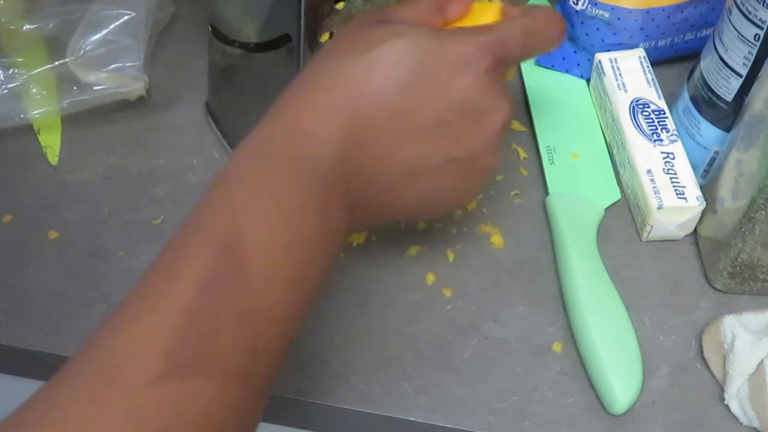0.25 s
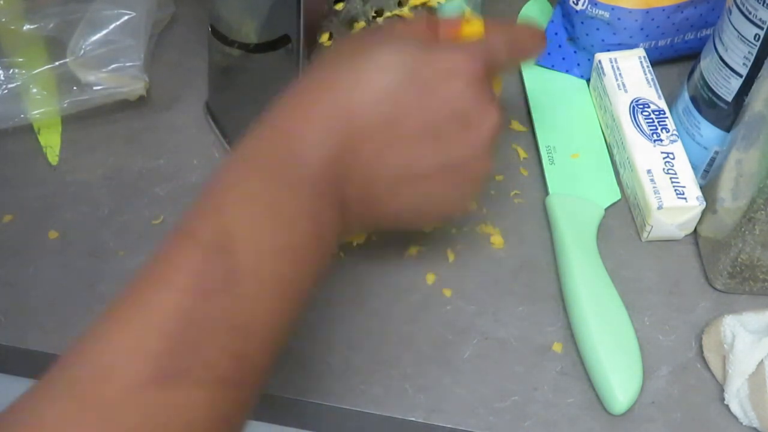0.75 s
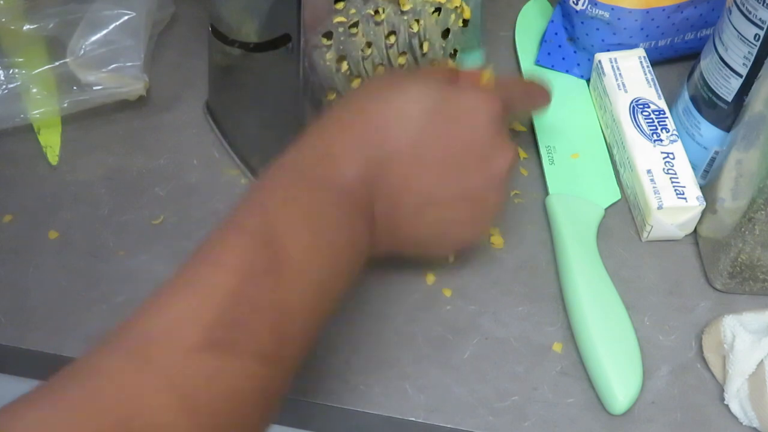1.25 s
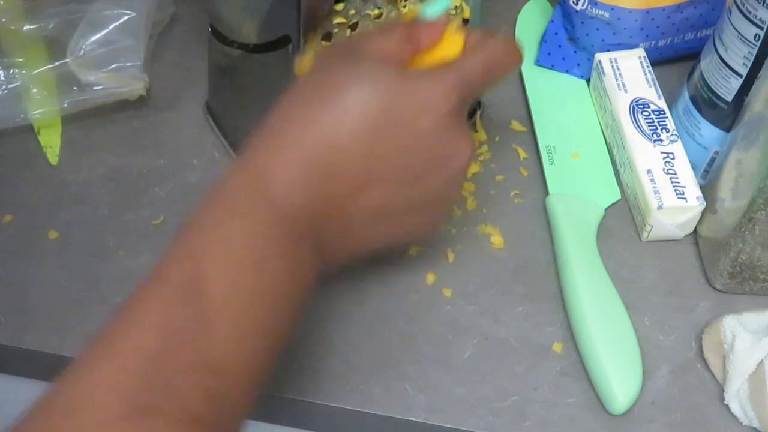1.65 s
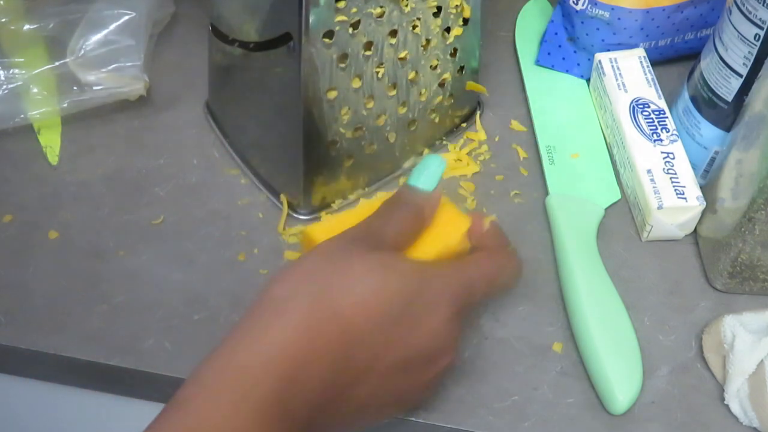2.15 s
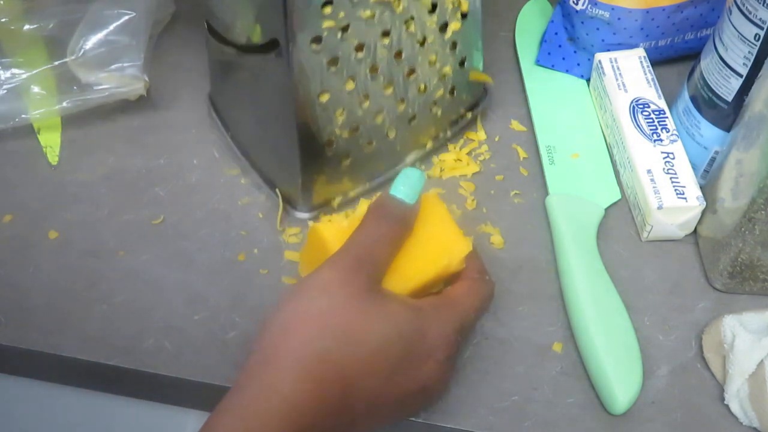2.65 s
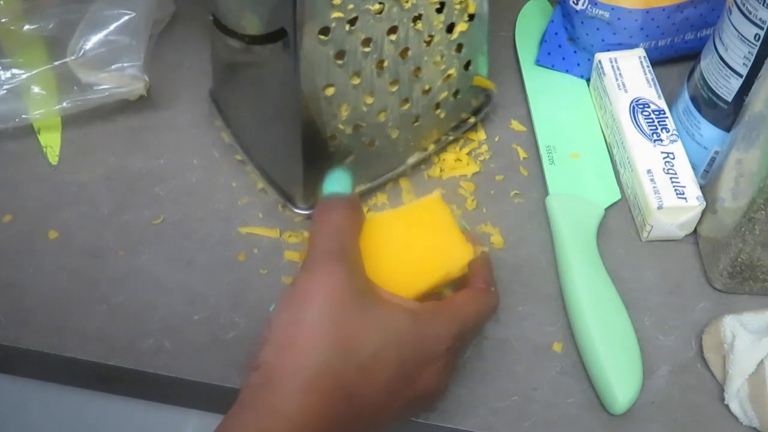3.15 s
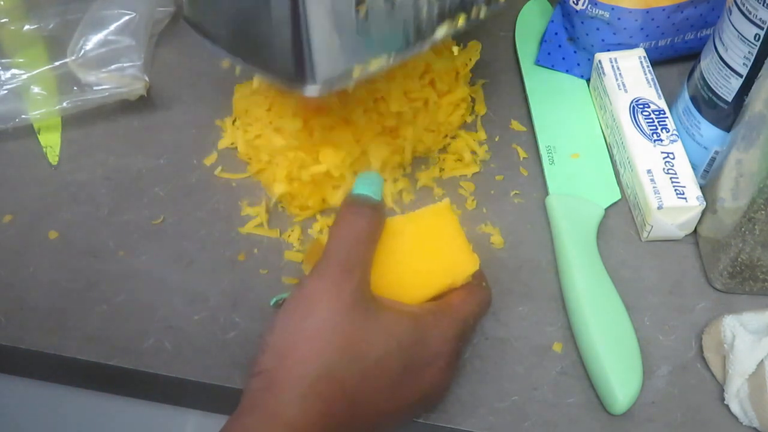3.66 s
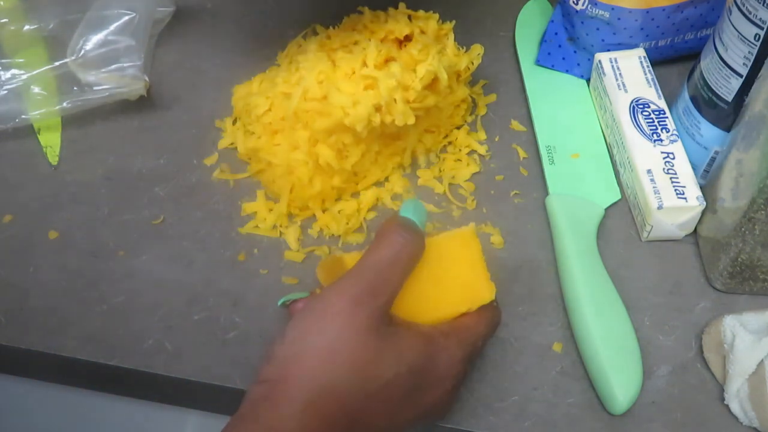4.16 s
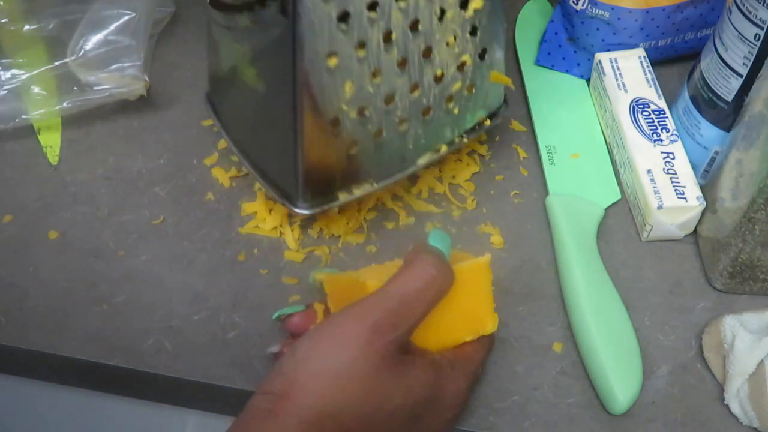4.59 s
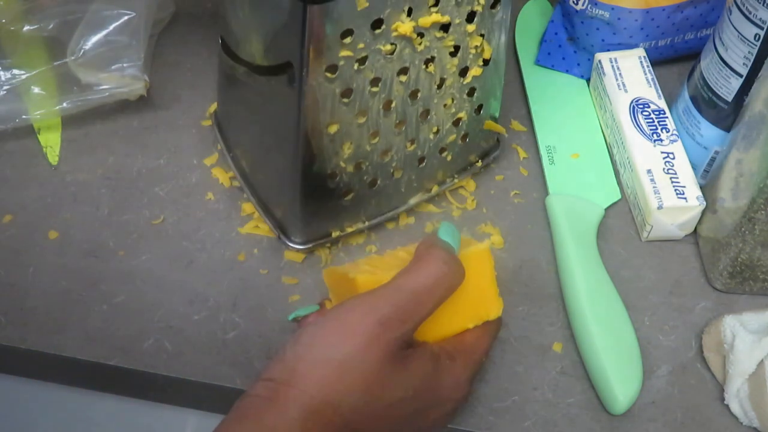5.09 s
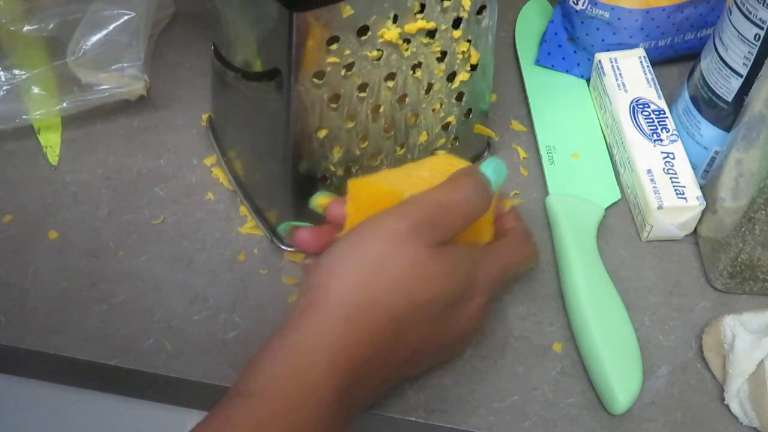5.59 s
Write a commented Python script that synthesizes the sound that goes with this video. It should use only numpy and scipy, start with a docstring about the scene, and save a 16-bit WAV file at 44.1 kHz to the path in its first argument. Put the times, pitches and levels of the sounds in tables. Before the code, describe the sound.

Close stereo capture in a small kitchen with short echo. A low appliance hum runs throughout. Soft hollow counter knocks and faint rubbing come first, then a metallic clink. Harder thuds, rattles and bright scrapes follow, ending in an overloaded bang just after three seconds. Hum is left, with faint ticks, then brief metal rasps near the end.

```python
"""Kitchen counter: cheese is grated on a steel box grater, close to a small stereo recorder.
The grater rocks and knocks on the hollow counter (ringing modes, crack, rattle, thump), ticks (struck steel modes)
and scrapes (dense random slips ringing the steel). An appliance hums: shaped noise and a motor tone.
Kitchen echo is decaying noise. The loudest knocks overload the recorder, whose gain control ducks and creeps back."""
import sys
import numpy as np
from scipy import signal
from scipy.fft import rfft, irfft, next_fast_len
from scipy.io import wavfile
from scipy.ndimage import uniform_filter1d, minimum_filter1d

SR = 44100
rng = np.random.default_rng(int(sys.argv[2]) if len(sys.argv) > 2 else 0)


def pcm_store(signal):
    """Save signal as 16-bit PCM."""
    levels = np.round(np.clip(np.atleast_2d(signal), -1, 1) * 32767)
    wavfile.write(sys.argv[1], SR, levels.astype(np.int16).T)


N = 257103


def amp(db):
    """Amplitude factor from dB."""
    return 10 ** (np.asarray(db) / 20)


def rms_one(x):
    """Scales to rms 1."""
    return x / np.sqrt(np.mean(x ** 2) + 1e-20)


def at_hz(points, hz):
    """Reads column 2 of a table on a log-frequency axis."""
    table_hz, value = np.transpose(points)
    return np.interp(np.log(hz), np.log(table_hz), value)


def band(x, low_hz, high_hz):
    """Butterworth band-pass."""
    return signal.sosfilt(signal.butter(2, [low_hz, high_hz], "band", fs=SR, output="sos"), x)


def narrow(x, low_hz, high_hz):
    """Band-pass with steep edges."""
    return band(band(x, low_hz, high_hz), low_hz, high_hz)


def bell(hz, centre_hz, octaves, order=2):
    """Weight in dB falling away from a centre pitch; a higher order has a flatter top."""
    distance = np.log2(hz / centre_hz) / octaves
    return np.maximum(-6 * distance ** order, -40)


def drift(rate_hz):
    """Slow random wander of rms 1, low-passed near rate_hz."""
    step = 40   # samples per control point
    pole = np.exp(-2 * np.pi * rate_hz * step / SR)
    noise = rng.standard_normal(N // step + 2002)
    slow = signal.lfilter([1], [1, -2 * pole, pole ** 2], noise)[2000:]
    return np.interp(np.arange(N) / step, np.arange(len(slow)), rms_one(slow))


def clicks(times_s, gains):
    """Impulse train."""
    out = np.zeros(N)
    out[np.round(np.asarray(times_s) * SR).astype(int)] = gains
    return out


def ring(drive, hz, t60_s):
    """Two-pole resonator: a unit click sets a sine of height 1 ringing."""
    r = amp(-60 / (t60_s * SR))
    w = 2 * np.pi * hz / SR
    return signal.lfilter([0, np.sin(w)], [1, -2 * r * np.cos(w), r * r], drive + 1e-18)


def fading(times_s, db, t60_s):
    """Envelope that jumps at each blow and dies exponentially."""
    return signal.lfilter([1], [1, -amp(-60 / (t60_s * SR))], clicks(times_s, amp(db)) + 1e-18)


def grit(per_s, spread_db):
    """Random clicks of either sign and uneven size, rms 1."""
    marks = (rng.random(N) < per_s / SR) * rng.choice([-1, 1], N)
    size_db = spread_db * np.minimum(rng.exponential(1, N), 4)
    return rms_one(marks * amp(size_db))


def two_sides(mid, side):
    """Left and right from a shared and an unshared part."""
    return mid + side * [[1], [-1]]


DETUNE = .008   # rms share by which pressure and place shift the modes from blow to blow


def strike(modes, blows, grip_t60_s, scatter_db, in_step_hz):
    """Place of a blow picks the modes, grip damps them; low modes start together, higher neighbours opposite."""
    hz, mode_db, t60_s = np.transpose(modes)[:, :, None]
    luck = rng.standard_normal((len(blows), 2, len(modes), 1))
    sign = np.where(hz < in_step_hz, 1, (-1) ** np.arange(len(modes))[:, None])
    t = np.arange(SR // 3) / SR
    out = np.zeros(N + SR)
    for (start_s, db, centre_hz, octaves, *_), grip_s, (chance, shift) in zip(blows, grip_t60_s, luck):
        start_db = db + mode_db + bell(hz, centre_hz, octaves) + scatter_db * chance
        level_db = start_db - 60 * t * (1 / t60_s + 1 / grip_s)
        tones = sign * amp(level_db) * np.sin(2 * np.pi * hz * (1 + DETUNE * shift) * t)
        out[round(start_s * SR):][:len(t)] += np.sum(tones, axis=0)
    return out[:N]


# broad appliance spectrum, shape only: pitch_hz, density_db
HUM = [(15, -12), (25, -15), (59, 0), (122, -8.5), (267, -6.5), (306, -17.5), (411, -7), (539, -14),
       (616, -14), (1210, -22.5), (1710, -22.5), (2240, -26.5), (5920, -35.5), (14000, -51.5), (15600, -62)]
# narrow hum bands, before patchiness: pitch_hz, width_hz, rms_db
HUM_BANDS = [(74.5, 9.1, -40.5), (97.6, 25, -45.5), (170.4, 12.4, -43), (224.4, 11, -41), (268.3, 14, -39),
             (342.7, 34, -45.5), (363, 1.6, -55.5), (382.6, 13, -42), (412.5, 12, -48), (489, 14, -54),
             (607.6, 40, -48.5), (656, 9.7, -57), (785, 17, -55)]
# unshared part of hum and echo: pitch_hz, side_minus_mid_db
APART = [(60, -49), (150, -26.5), (380, -21.5), (950, -12.5), (2380, -12.5), (5980, -5.5), (15000, 5)]
HUM_RMS_DB, HUM_PATCHY_DB = -35, 0.59   # broad part before patchiness; rms wander of level


def hum():
    """Appliance: broad noise plus narrow noise bands, slightly patchy, only partly shared by the two sides."""
    size = next_fast_len(N)
    hz = np.maximum(np.arange(size // 2 + 1) * SR / size, 1)
    broad = amp(at_hz(HUM, hz))
    broad = broad / np.sqrt(np.mean(broad ** 2)) * amp(HUM_RMS_DB)
    power = broad ** 2
    for centre_hz, width_hz, rms_db in HUM_BANDS:
        shape = 1 / (1 + (2 * (hz - centre_hz) / width_hz) ** 2) ** 2
        power = power + shape / np.mean(shape) * amp(rms_db) ** 2
    spectra = rfft(rng.standard_normal((2, size))) * np.sqrt(power)
    mid, side = irfft(spectra * [np.ones(len(hz)), amp(at_hz(APART, hz))], size)[:, :N]
    return two_sides(mid, side) * amp(HUM_PATCHY_DB * drift(21.0))


MOTOR_HZ, MOTOR_RMS_DB, MOTOR_WAVER_DB = 58.15, -40, 1


def motor():
    """Appliance motor: a sine of fixed pitch, wavering in level."""
    turning = np.sin(2 * np.pi * (MOTOR_HZ * np.arange(N) / SR + rng.random()))
    return np.sqrt(2) * amp(MOTOR_RMS_DB + MOTOR_WAVER_DB * drift(9.6)) * turning


# kitchen echo: pitch_hz, t60_s
KITCHEN = [(150, 0.18), (400, 0.3), (1000, 0.46), (2500, 0.11), (6000, 0.52), (12000, 0.091)]
KITCHEN_DB = -11   # echo energy against the dry sound


def kitchen(x):
    """Dense echo: octave bands of noise, each dying at its own rate, nearly alike at the two close ports."""
    t = np.arange(SR // 2) / SR
    tail = 0
    for low_hz in 220 * 2. ** np.arange(7):
        noise = band(rng.standard_normal((2, len(t))), low_hz, min(2 * low_hz, .45 * SR))
        onset = np.clip(t / 0.016, 0, 1)
        fade = amp(-60 * t / at_hz(KITCHEN, 1.61 * low_hz)) * onset
        tail = tail + noise * fade * [[1], [amp(at_hz(APART, low_hz))]]
    tail = two_sides(*tail) / np.sqrt(np.sum(tail[0] ** 2))
    return signal.fftconvolve(x[None], tail, axes=1)[:, :N]


# knocks on the counter: start_s, level_db, centre_hz, spread_octaves, grip_t60_s (weight left on it), crack_db
KNOCKS = [(.002, -21, 295, 0.95, 0.27, -29), (.478, -12.5, 258, 3.2, 0.079, -35),
          (0.483, -24.5, 300, 2, 0.068, -44), (0.502, -20, 980, 0.99, .3, -55),
          (0.706, -32, 905, 1.7, .3, -45), (0.849, -20.5, 380, 0.3, 0.074, -42),
          (1.227, -23.5, 925, 2, .1, -37), (1.577, -16.5, 344, 2.1, 0.11, -36),
          (1.590, -23, 900, 0.51, .3, -54), (1.878, -10, 403, 0.85, 0.16, -64),
          (1.896, -13.5, 410, 0.83, 0.36, -25), (2.556, -16, 395, .5, 0.21, -67),
          (2.570, -7.5, 373, 0.25, .1, -62), (2.58, -12, 453, 0.68, .06, -60),
          (2.605, -14.5, 393, 0.7, 0.068, -36), (2.615, -3.5, 398, 0.65, 0.065, -46),
          (2.630, -4, 607, 0.17, 0.12, -62), (2.800, 3.5, 350, 0.84, 0.086, -27),
          (2.813, -5.5, 346, 0.86, 0.12, -59), (2.829, -12.5, 260, 0.62, .2, -64),
          (3.121, 11.5, 457, 0.87, 0.1, -10.5), (3.139, -10, 191, .4, 0.45, -59),
          (3.150, -4.5, 660, 0.72, 0.45, -48), (3.192, -16, 390, 0.35, .1, -54)]
# hollow counter modes: pitch_hz, level_db, t60_s
COUNTER = [(183, -2, 0.14), (200.6, 4.5, 0.15), (240, -14.5, 0.11), (336, -3.5, 0.013), (374.4, 0.5, 0.075),
           (446, -1.5, 0.053), (496, -7, 0.047), (608, -6, 0.045), (755, -1, 0.027), (880, -10.5, 0.063),
           (970, -18, 0.016), (1184, -0.5, 0.039), (1395, -6, 0.039), (1520, -8.5, 0.036)]
# push of the arm landing on the counter: start_s, level_db
THUMPS = [(.010, -15), (0.498, -9.5), (1.592, -9.5)]
THUMP_HZ, THUMP_T60_S = 46.4, 0.064
CONTACT_HZ = 1700   # upper edge of the soft contact
RATTLE_LOW_HZ, RATTLE_HIGH_HZ, RATTLE_T60_S = 348, 2170, 0.22
RATTLE_DB, RATTLE_HARDNESS = -9, 0.49   # against the knock; share by which a sharper crack shakes more loose


def knocks():
    """Counter modes under a soft contact, a noise crack, things rattling on the counter, deep thumps."""
    start_s, db, *_, grip_t60_s, crack_db = np.transpose(KNOCKS)
    modes = strike(COUNTER, KNOCKS, grip_t60_s, scatter_db=2.5, in_step_hz=430)
    body = band(band(modes, 185, 1960), 191, CONTACT_HZ)
    crack = band(fading(start_s, crack_db, 0.019) * rng.standard_normal(N), 820, 5900)
    rattle_db = db + RATTLE_DB + RATTLE_HARDNESS * (crack_db - db)
    shaking = fading(start_s, rattle_db, RATTLE_T60_S)
    rattle = shaking * rms_one(narrow(grit(3000, 2.4), RATTLE_LOW_HZ, RATTLE_HIGH_HZ))
    push_s, push_db = np.transpose(THUMPS)
    thump = band(ring(clicks(push_s, -amp(push_db)), THUMP_HZ, THUMP_T60_S), 11.0, 340)
    return body + crack + rattle + thump


# ticks on the steel, also where a hard knock jars it:
# start_s, level_db, centre_hz, spread_octaves, grip_t60_s, crack_db
TICKS = [(1.872, -15, 2350, 1.2, 0.026, -40), (1.876, -16, 2600, 2.0, 0.013, -40),
         (1.884, -16, 1740, .3, .06, -60), (1.895, -7.5, 2600, 0.15, 0.031, -31),
         (1.915, -21, 1700, 0.18, 0.071, -60), (2.373, -20, 1630, 0.54, 0.014, -55),
         (2.642, -6, 2800, 2.3, 0.0084, -22.5), (2.648, -14, 2000, 1.5, 0.0083, -45),
         (2.684, -13.5, 3000, 1.3, 0.014, -35), (2.713, -21, 2500, 0.67, 0.009, -40),
         (2.724, -17, 2010, 0.62, .012, -47), (2.732, -17, 2000, 0.93, 0.022, -50),
         (2.800, -5.5, 1490, 0.75, 0.023, -47), (3.120, 5.5, 2010, 0.58, 0.0097, -25),
         (4.662, -20, 2840, 0.2, 0.05, -37), (4.673, -24, 2930, 0.18, 0.067, -55),
         (4.689, -31, 2810, 0.22, 0.05, -60), (4.72, -26.5, 2820, 0.14, 0.057, -64),
         (5.619, -11, 1870, 0.33, .015, -50), (5.627, -15.5, 900, 0.34, 0.024, -56),
         (5.636, -22, 1710, 0.33, 0.036, -48), (5.717, -11.5, 2520, 1, 0.012, -44),
         (5.736, -24, 1700, 0.33, 0.055, -60), (5.757, -20, 1300, 0.32, 0.07, -60),
         (5.770, -26, 2820, 0.23, .06, -46), (5.812, -8, 2480, 0.53, 0.019, -38)]
# steel grater modes, damped by hand and cheese; also rung by scrapes(): pitch_hz, level_db, t60_s
GRATER = [(805, 2, 0.046), (914, 0.5, 0.071), (1095, -6, 0.33), (1240, -7, 0.12), (1462, -11, 0.096),
          (1540, -13, .03), (1660, -7, 0.13), (1750, -9, .09), (1880, -11.5, 0.027), (2050, -9, 0.038),
          (2150, -11.5, 0.034), (2267, -9.5, 0.12), (2350, -14.5, 0.022), (2520, -15, 0.035),
          (2702, -9, 0.1), (2955, -11, 0.18), (3167, -9.5, 0.091), (3330, -15, 0.093), (3430, -10.5, 0.046),
          (3753, -10.5, 0.07), (4170, -11, 0.026), (4270, -18, .05), (4400, -12.5, 0.059),
          (5030, -14.5, 0.051), (5680, -12.5, 0.071), (6000, -18, 0.016), (6500, -16.5, .03),
          (6650, -11, 0.013), (7480, -7.5, 0.0078), (9000, -12, .004), (10400, -23, 0.0023),
          (12500, -18, 0.0027), (14500, -15, .003)]
CRACK_T60_S, CRACK_LOW_HZ = 0.037, 2000


def ticks():
    """A nail or an edge taps the steel: modes and a sharp noise crack."""
    start_s, *_, grip_t60_s, crack_db = np.transpose(TICKS)
    crack = band(fading(start_s, crack_db, CRACK_T60_S) * rng.standard_normal(N), CRACK_LOW_HZ, 15000)
    modes = strike(GRATER, TICKS, grip_t60_s, scatter_db=3.5, in_step_hz=100)
    return band(modes, 630, 21000) + crack


# strokes of rubbing on the steel: start_s, swell_s, hold_s, level_db, centre_hz, spread_octaves
SCRAPES = [(0.49, .005, 0.03, -40, 1150, 0.55), (0.692, .015, 0.06, -50.5, 1400, 1.8),
           (1.24, 0.014, 0.041, -46, 1050, 0.74), (1.867, 0.0024, 0.033, -37.5, 1900, 2.4),
           (2.638, 0.0032, 0.002, -28.5, 2530, 2.7), (2.681, 0.0047, 0.023, -21.5, 2680, 1.21),
           (2.742, 0.0083, 0.036, -38, 2440, 1.26), (2.946, 0.012, 0.0053, -40.5, 1590, 0.65),
           (2.986, 0.021, 0.0068, -36, 1690, 0.82), (3.057, 0.018, 0.057, -42, 1567, 1.1),
           (5.621, 0.011, 0.0033, -20.5, 1650, 0.42), (5.716, 0.001, 0.0057, -28, 2020, 1.04),
           (5.731, 0.021, 0.035, -33, 1890, 0.89), (5.808, 0.0022, .003, -33.5, 2520, 1.3)]
SWELL_DB = 21   # rise to full pressure
LIFT_DB_PER_S, SAG_OCTAVES_PER_S = 619, 2.5   # fade and dulling as the hand lets go


def strokes():
    """Each stroke swells, holds and fades; the strongest at a moment sets level, centre and spread."""
    start_s, swell_s, hold_s, db, centre_hz, octaves = np.transpose(SCRAPES)[:, :, None]
    since_s = np.arange(N) / SR - start_s
    lifting_s = np.maximum(since_s - swell_s - hold_s, 0)
    missing = np.clip(1 - since_s / swell_s, 0, 1)
    level_db = db - SWELL_DB * missing - LIFT_DB_PER_S * lifting_s
    level_db[since_s < 0] = -np.inf
    lead, now = np.argmax(level_db, axis=0), np.arange(N)
    sag = 2 ** -np.minimum(SAG_OCTAVES_PER_S * lifting_s[lead, now], 1)
    return level_db[lead, now], centre_hz[lead, 0] * sag, octaves[lead, 0]


SLIPS_PER_S, SLIP_SPREAD_DB = 2000, 4.3
SLIP_COUPLING_DB = -16   # a slip stirs the steel far less than a tap
PRESSED_T60_S = 0.046   # cheese pressed on the steel shortens the ring


def scrapes():
    """Dense uneven slips over the teeth ring the grater modes, weighted by the stroke."""
    slips = grit(SLIPS_PER_S, SLIP_SPREAD_DB) * amp(1.77 * drift(93))   # strength comes in clumps
    db, centre_hz, octaves = strokes()
    rub = np.zeros(N)
    for k, (hz, mode_db, t60_s) in enumerate(GRATER):
        weight = amp(db + mode_db + bell(hz, centre_hz, octaves, order=4))
        drive = np.roll(slips, 997 * k) * weight   # each mode takes the slips at another offset
        rub += ring(drive, hz, 1 / (1 / t60_s + 1 / PRESSED_T60_S))
    return amp(SLIP_COUPLING_DB) * band(rub, 500, 12000)


def scene():
    """Knocks, ticks and scrapes in the room, over the hum."""
    work = knocks() + ticks() + scrapes()
    return work + amp(KITCHEN_DB) * kitchen(work) + hum() + motor()


LAG_S = 1 / 44100   # left port later
# left port hears a little less in the low middle
LEFT_DIP_LOW_HZ, LEFT_DIP_HIGH_HZ, LEFT_DIP_SHARE = 270, 1160, 0.057
DUCK_FROM_DB, HOLD_S, RECOVER_DB_PER_S, ATTACK_S = -11, 0.15, 10, 0.044
LOW_CUT_HZ, STOP_HZ = 21.6, 16050   # STOP_HZ: 50 dB down from here up


def record(dry):
    """Two ports a little apart, gain control with hold and slow recovery, overload, low cut, cut-off."""
    dip = LEFT_DIP_SHARE * band(dry[0], LEFT_DIP_LOW_HZ, LEFT_DIP_HIGH_HZ)
    ports = np.stack([np.roll(dry[0] - dip, round(LAG_S * SR)), dry[1]])
    level = np.sqrt(uniform_filter1d(np.mean(ports ** 2, axis=0), size=300) + 1e-12)
    over_db = np.maximum(20 * np.log10(level) - DUCK_FROM_DB, 0)
    hold = 2 * int(HOLD_S * SR / 2) + 1
    # deepest duck of the last HOLD_S
    held_db = -minimum_filter1d(-over_db, hold, origin=hold // 2, mode="constant")
    recovered_db = RECOVER_DB_PER_S * np.arange(N) / SR
    duck_db = np.maximum.accumulate(held_db + recovered_db) - recovered_db
    keep = np.exp(-1 / (ATTACK_S * SR))
    gained = ports * amp(-signal.lfilter([1 - keep], [1, -keep], duck_db))
    low_cut = signal.butter(2, LOW_CUT_HZ, "high", fs=SR, output="sos")
    clipped = signal.sosfilt(low_cut, np.clip(gained, -1, 1))
    cut_off = signal.cheby2(12, 50, STOP_HZ, fs=SR, output="sos")
    return signal.sosfilt(cut_off, np.clip(clipped, -1, 1))


dry = scene()
out = record(dry)
pcm_store(out)
```